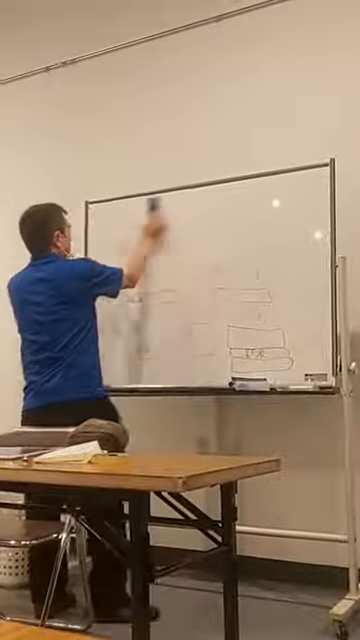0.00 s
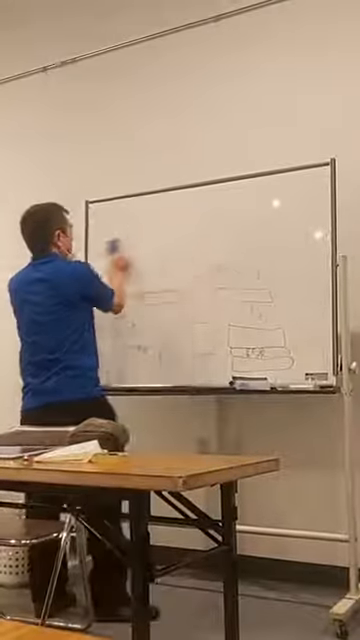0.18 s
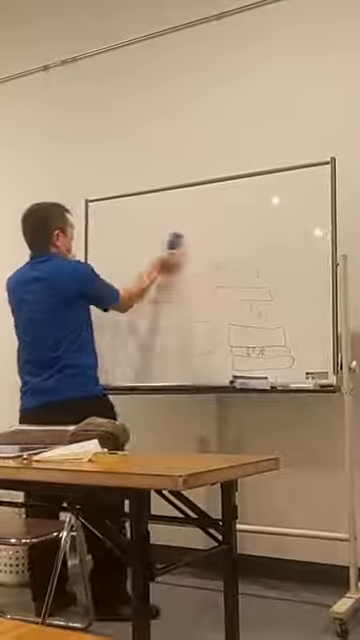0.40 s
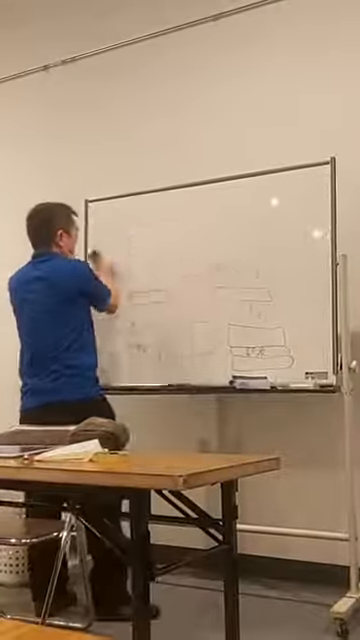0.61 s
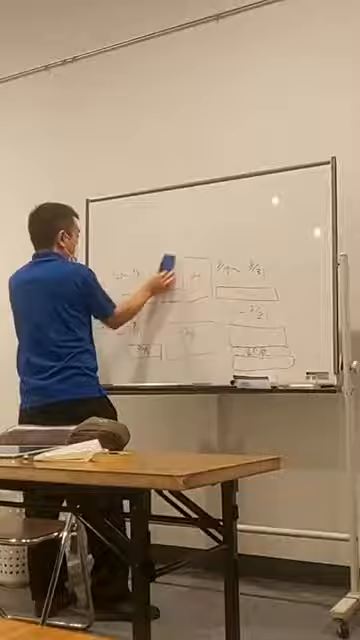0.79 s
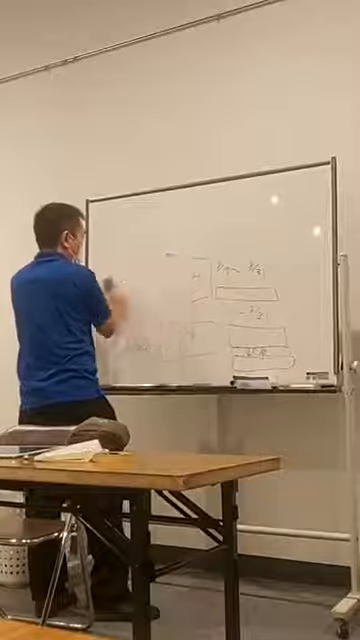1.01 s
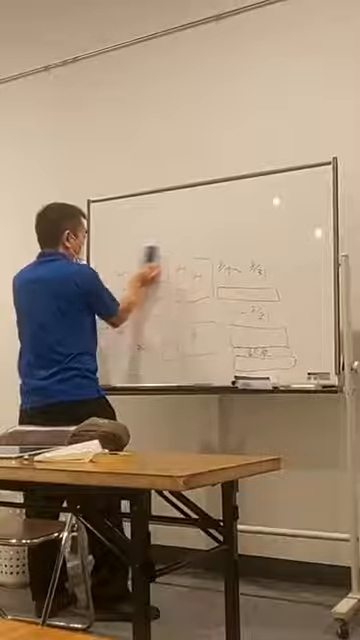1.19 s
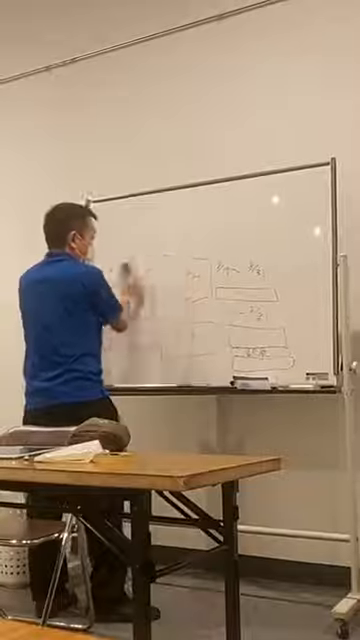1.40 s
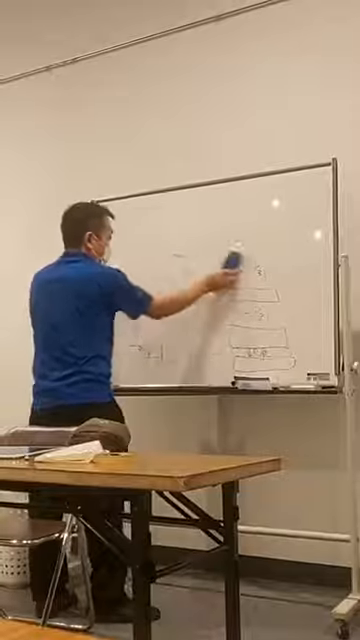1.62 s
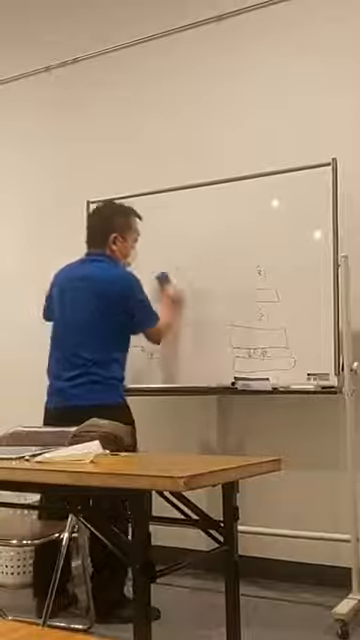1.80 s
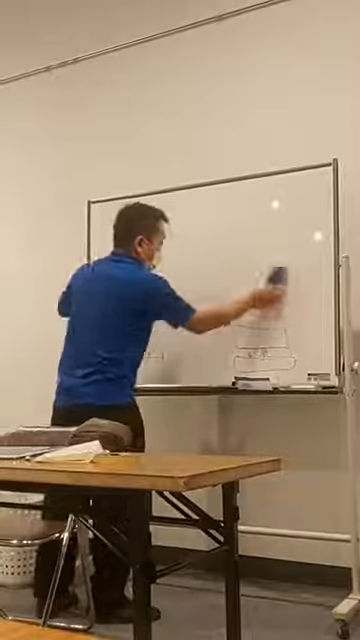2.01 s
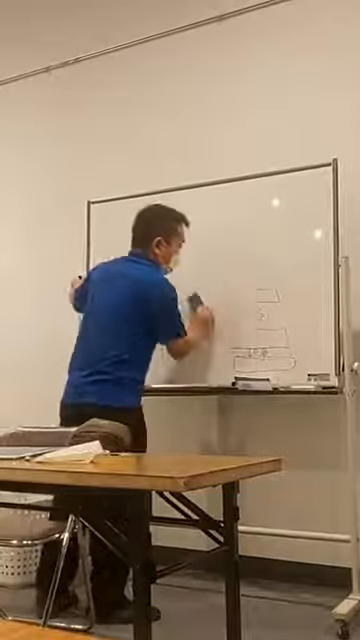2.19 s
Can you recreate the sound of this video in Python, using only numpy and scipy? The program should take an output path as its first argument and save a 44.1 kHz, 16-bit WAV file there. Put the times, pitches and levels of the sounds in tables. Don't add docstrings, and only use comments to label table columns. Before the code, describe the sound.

Whiteboard eraser squeaks, thin and very high, with each rubbing stroke in a quiet bare room

```python
import sys
import numpy as np
from scipy import signal
from scipy.fft import rfft, irfft
from scipy.io import wavfile
from scipy.ndimage import uniform_filter1d

SR = 44100
rng = np.random.default_rng(int(sys.argv[2]) if len(sys.argv) > 2 else 0)


def nominal_scale(level):
    x = np.asarray(level, float) / 20
    return 10 ** x


def generate_wav(signal):
    frames = np.transpose(np.atleast_2d(signal))
    scaled = np.clip(frames, -1, 1) * 32767
    pcm = np.round(scaled).astype(np.int16)
    wavfile.write(sys.argv[1], SR, pcm)


N = 97020
LEAD_S = 0.3


def sing(s, hz, db, rough, grit_db):
    wobble_hz, wobble_rate_hz = 322, 174
    flutter_db, flutter_rate_hz = 16.5, 95
    grit_low_hz, grit_high_hz = 9200, 10900
    wobble = drift(wobble_rate_hz, SR // 2)
    flutter = drift(flutter_rate_hz, SR // 2)
    white = rng.standard_normal(SR // 2)

    i = np.arange(int(s[0] * SR), int(s[-1] * SR))
    hz = np.interp(i / SR, s, hz)
    db = np.interp(i / SR, s, db)
    rough = np.interp(i / SR, s, np.clip(rough, 0, 1))
    pitch = hz + wobble_hz * rough * np.tanh(wobble[:len(i)])
    tone = np.sqrt(2) * np.sin(2 * np.pi * np.cumsum(pitch) / SR)
    grit_band = [grit_low_hz, max(grit_high_hz, 1.05 * hz.max())]
    grit = signal.sosfilt(signal.butter(2, grit_band, "band", fs=SR, output="sos"), white[:len(i)])
    gain = nominal_scale(db + flutter_db * rough * np.tanh(flutter[:len(i)]))

    lead = int(LEAD_S * SR)
    out = np.zeros(N + lead)
    out[i + lead] = (tone + nominal_scale(grit_db) * grit) * gain
    return out


def long_squeaks():
    # time in seconds, pitch in Hz.
    glides = [
        [(.528, 9130), (.556, 9170), (.582, 9400), (.598, 9300), (.61, 9020), (.626, 9200), (.645, 8900),
         (.665, 9000)],
        [(.906, 9230), (.914, 9170), (.924, 9110), (.942, 9220), (.951, 9250), (.97, 9240), (.998, 9220),
         (1.008, 8950), (1.016, 8900)],
        [(1.243, 9170), (1.251, 9190), (1.278, 9370), (1.292, 9500), (1.305, 9320), (1.322, 9200),
         (1.345, 9100)],
    ]
    glide_levels = [
        [-67, -35.5, -40.5, -37.5, -33.5, -36.5, -30.5, -52],
        [-70, -48, -41, -44, -35, -36.5, -39, -36, -61],
        [-77, -41.5, -38, -35.5, -36, -33, -42],
    ]
    roughen_times = [0.082, 0.043, .025]
    out = 0
    for curve, db, turn in zip(glides, glide_levels, roughen_times):
        s, hz = np.transpose(curve)
        rough = np.interp(s - s[0], [turn / 2, turn], [0.11, 0.31])
        out = out + sing(s, hz, db, rough, grit_db=-30)
    return out


def steady_squeaks():
    # start in seconds, hold in seconds, pitch in Hz.
    chirps = [ (-.17, .03, 9230), (.18, .01, 10250), (.2, .007, 9950), (.215, .003, 9900),
              (.226, .005, 9960), (.219, .042, 9070), (.202, .015, 10900), (.215, .03, 9480),
              (.958, .016, 9550), (.968, .012, 9020), (.945, .035, 10800), (1.288, .04, 9060),
              (1.255, .03, 9620), (1.265, .045, 10700), (1.778, .016, 7150), (1.799, .018, 7120),
              (1.765, .16, 13900), (.638, .02, 8900), ]
    # level in dB, roughness from 0 to 1, grit in dB.
    chirp_voices = [(-37.5, 0.31, -36), (-68.5, 1, -30), (-31, 0.25, -25.5), (-29.5, 0.25, -32.5),
                    (-32, 0.3, -28), (-34.5, 0.32, -30), (-74, 0.3, 31.5), (-47, 0.83, -22.5),
                    (-49, 0.52, -19), (-37.5, 0.38, -30), (-81, 0.3, 25), (-36.5, 0.26, -36),
                    (-60, 0.55, -10), (-79.5, .3, 24), (-72, 0.068, -30), (-57.5, 0.1, -30), (-79, .2, -30),
                    (-41.5, 0.24, -33)]
    attack_s, release_s, edge_db = 0.008, 0.0066, -39
    out = 0
    for (s, hold, hz), (db, rough, grit_db) in zip(chirps, chirp_voices):
        times = [s - attack_s, s, s + hold, s + hold + release_s]
        levels = [db + edge_db, db, db, db + edge_db]
        out = out + sing(times, [hz] * 4, levels, [rough] * 4, grit_db)
    return out


def felt():
    # time in seconds, level in dB, brightness in dB per octave.
    stroke = [(0.0, -61, -1.5), (0.19, -63, -1), (0.21, -59, -0.5), (0.26, -62, 0), (0.51, -64.5, -1),
              (0.61, -60.5, 2.5), (0.62, -62, 1.5), (0.77, -60.5, 0), (0.88, -63.5, -2), (0.91, -63, 0.5),
              (1.15, -62, -0.5), (1.33, -61.5, 0.5), (1.39, -58.5, 1), (1.65, -67.5, -0.5),
              (1.97, -61.5, 1.5), (2.029, -66, 0), (2.16, -64, 0), (2.2, -66, 1)]
    # centre in Hz, width in Hz, level in dB.
    felt_bands = [(1112, 594, -6.5), (1538, 372, -6), (4015, 1010, -5.5), (5497, 770, 1),
                  (9840, 3340, -4.5), (12100, 2400, -4.5)]
    patchy_db, patchy_rate_hz = 2, 17.8
    s, db, bright_db = np.transpose(stroke)
    t = np.arange(N) / SR
    out = 0
    for hz, width, level_db in felt_bands:
        rubbed = resonance(rng.standard_normal(N), hz, width)
        band = rms_one(resonance(rubbed, hz, 1.55 * width))
        tilt_db = np.interp(t, s, bright_db) * np.log2(hz / 5000)
        out = out + band * nominal_scale(level_db + tilt_db + patchy_db * drift(patchy_rate_hz, N))
    return out * nominal_scale(np.interp(t, s, db) - 4.0)


def ticks():
    # time in seconds, peak in dB, hollow ring in dB, middle ring in dB, bright part in dB.
    knocks = [
        (0.067, -55.5, -5, 2, 8),
        (0.753, -48.5, 0, -10, -8),
        (0.912, -47, 2, 0.5, -8),
        (1.142, -55, -8, -6, -9),
        (1.164, -49, -9, -3, -17),
        (1.355, -56, -11, -9, -4),
        (1.374, -58, -17, -4, -4),
        (2.125, -52, -1, -1, 7.5),
    ]
    # pitch in Hz, level in dB, decay by 60 dB in seconds.
    holder_modes = [(1010, -6, .035), (1189, -11, 0.025), (1357, -7.5, 0.03), (1600, -9, 0.035),
                    (2700, -18, .015), (4260, -12, 0.03), (6150, -11.5, 0.02), (7200, -19, .012)]
    crack_db, crack_t60_s, wet_db = -11, 0.016, -11.5
    s, db, hollow_db, middle_db, bright_db = np.transpose(knocks)
    at = (s * SR).astype(int)
    out = np.zeros(N)
    for k, (hz, level_db, t60) in enumerate(holder_modes):
        if hz < 1100:
            part_db = hollow_db
        elif hz < 1480:
            part_db = middle_db
        else:
            part_db = bright_db * (hz > 2500)
        clicks = np.zeros(N)
        clicks[at] = (-1) ** k * nominal_scale(db + level_db + part_db)
        r, w = nominal_scale(-60 / (t60 * SR)), 2 * np.pi * hz / SR
        out += signal.lfilter([0, np.sin(w)], [1, -2 * r * np.cos(w), r * r], clicks + 1e-18)

    crack = np.zeros(N)
    crack[at] = nominal_scale(db + crack_db + bright_db)
    t = np.arange(SR // 20) / SR
    burst = rng.standard_normal(len(t)) * nominal_scale(-60 * t / crack_t60_s)
    out += signal.fftconvolve(crack, burst)[:N]
    return out + nominal_scale(wet_db) * room(out)


def ventilation():
    # frequency in Hz, density in dB per Hz.
    rumble_curve = [(15, -40), (32, -21), (54, -2), (102, -2), (147, -13.5), (195, -6), (361, -20),
                    (494, -20.5), (900, -29), (1170, -57), (1980, -120)]
    # pitch in Hz, width in Hz, level in dB.
    motor_lines = [(70.3, 33, -65), (99.1, 3.7, -66.5), (199.4, 17, -73.5)]
    # frequency in Hz, density in dB per Hz.
    air_curve = [(410, -14), (700, -0.5), (1510, -17.5), (2690, 2.5), (5580, 2.5), (7450, -10.5),
                 (9220, -15), (9820, -35), (14100, 3)]
    hum = 0
    for hz, width, db in motor_lines:
        line = resonance(rng.standard_normal(N + SR), hz, width)[SR:]
        hum = hum + nominal_scale(db) * rms_one(line)
    return nominal_scale(-62) * coloured(rumble_curve) + hum + nominal_scale(-71) * coloured(air_curve)


def room(x):
    t60_s, late_t60_s, late_db = 0.41, 1.32, -21
    first_echo_s, build_s = 0.0033, 0.011
    t = np.arange(SR) / SR
    build = np.clip((t - first_echo_s) / build_s, 0, 1)
    decay = nominal_scale(-60 * t / t60_s) + (1 - t) * nominal_scale(late_db - 60 * t / late_t60_s)
    echo = rng.standard_normal(SR) * build * decay
    return signal.fftconvolve(x, echo / np.sqrt(np.sum(echo ** 2)))[:len(x)]


def rms_one(x):
    return x / np.sqrt(np.mean(x ** 2) + 1e-20)


def drift(rate, size):
    r = np.exp(-2 * np.pi * rate / SR)
    wander = signal.lfilter([1], [1, -2 * r, r * r], rng.standard_normal(size + 9000))
    return rms_one(wander[9000:])


def coloured(points):
    hz, db = np.transpose(points)
    f = np.arange(1, N // 2 + 2) * SR / N
    shape = nominal_scale(np.interp(np.log(f), np.log(hz), db, -90, -90))
    return rms_one(irfft(rfft(rng.standard_normal(N)) * shape, N))


def resonance(x, hz, width):
    r = np.exp(-np.pi * width / SR)
    poles = [1, -2 * r * np.cos(2 * np.pi * hz / SR), r * r]
    return signal.lfilter((1 - r * r) / 2 * np.array([1, 0, -1]), poles, x + 1e-18)


def starve(x):
    # frequency in Hz, depth in dB.
    starve_depths = [(6500, 67), (7400, 53), (7800, 38), (8400, 34), (8700, 41), (9900, 51), (10400, 36.5),
                     (11300, 39), (11700, 35.5), (12700, 40.5), (13100, 31), (14500, 17)]
    lag = 0.58
    soft_db, chance_db = 1.0, 2.5
    thin_hz, thin_share = 12950, 0.8
    f, _, z = signal.stft(x, SR, nperseg=1024, noverlap=768)
    power = np.abs(z[:-1]) ** 2 + 1e-20
    band_power = power.reshape(64, 8, -1).mean(axis=1)
    db = 10 * np.log10(uniform_filter1d(band_power, size=5, axis=1))
    hz = f[4::8][:64]
    loud = signal.lfilter([1 - lag], [1, -lag], nominal_scale(db[hz > 6000].max(axis=0)))

    spare_db = db - 20 * np.log10(loud + 1e-20) + np.interp(hz, *np.transpose(starve_depths))[:, None]
    chance = rms_one(uniform_filter1d(rng.standard_normal(db.shape), size=8, axis=1))
    spare_db = np.repeat(spare_db + chance_db * chance, 8, axis=0)
    line_db = 10 * np.log10(power) - np.repeat(db, 8, axis=0)
    spare_db = spare_db + thin_share * line_db * (f[:-1, None] > thin_hz)
    z[:-1] *= 0.5 + 0.5 * np.tanh(spare_db / soft_db)
    return signal.istft(z, SR, nperseg=1024, noverlap=768)[1][:N]


def scene():
    sung = long_squeaks() + steady_squeaks()
    sung = (sung + nominal_scale(-1.26) * room(sung))[-N:]
    return (sung + felt() + ticks() + ventilation())[None]


def roll_off(x):
    return signal.sosfilt(signal.butter(12, 14290, fs=SR, output="sos"), x)


def record(dry):
    x = signal.sosfilt(signal.cheby2(10, 30, 14900, fs=SR, output="sos"), dry)
    x = signal.sosfilt(signal.butter(4, 33, "high", fs=SR, output="sos"), x)
    mix = starve(x[0])[None]
    return roll_off(mix)


dry = scene()
out = record(dry)
generate_wav(out)
```